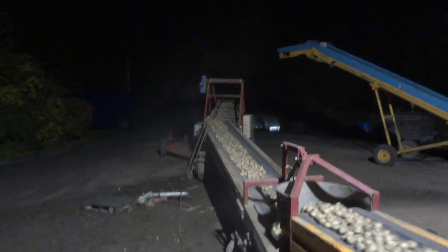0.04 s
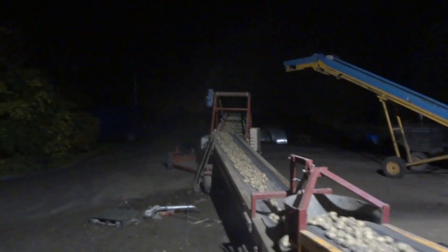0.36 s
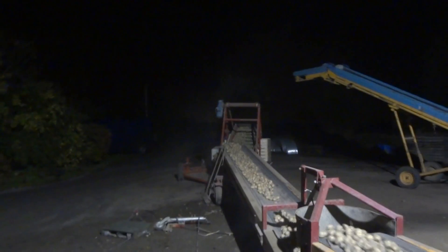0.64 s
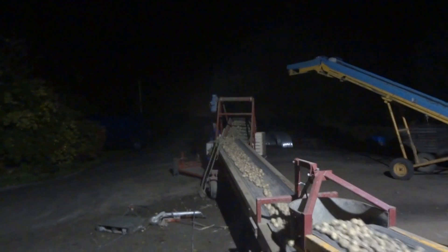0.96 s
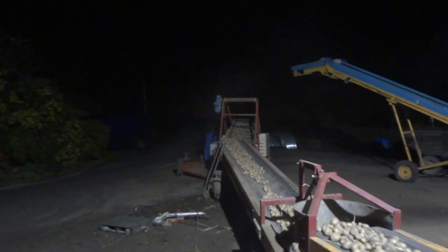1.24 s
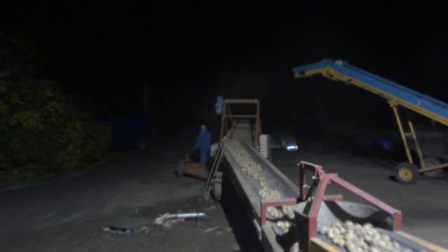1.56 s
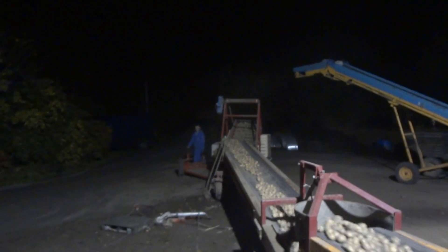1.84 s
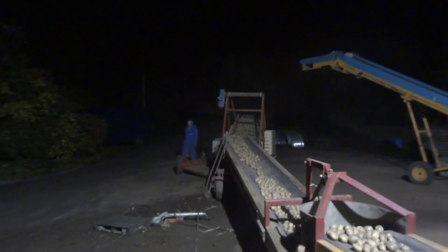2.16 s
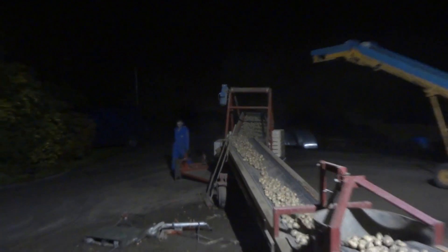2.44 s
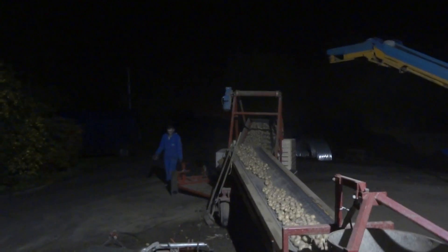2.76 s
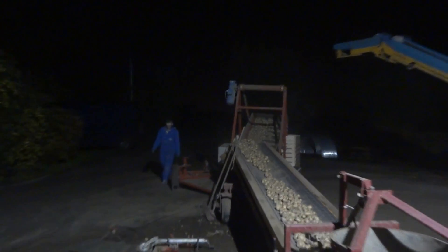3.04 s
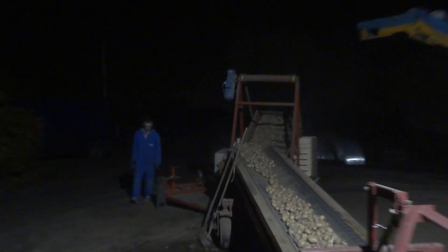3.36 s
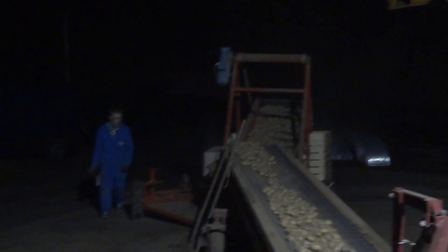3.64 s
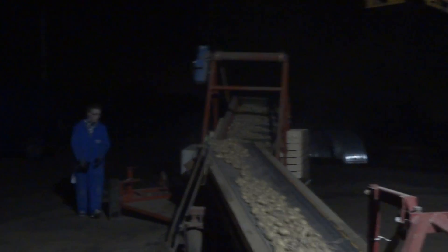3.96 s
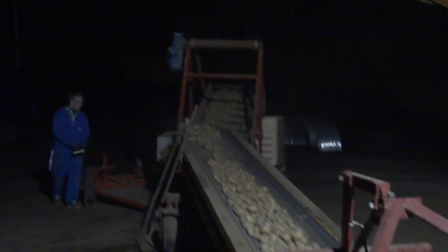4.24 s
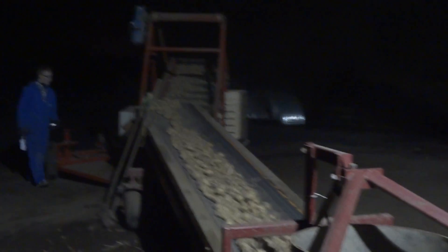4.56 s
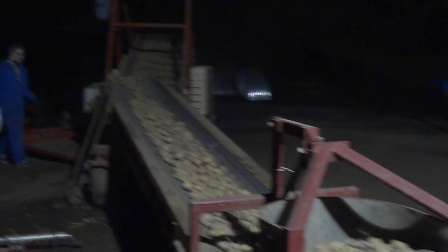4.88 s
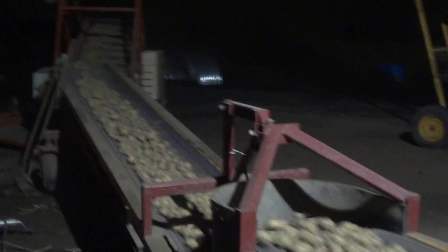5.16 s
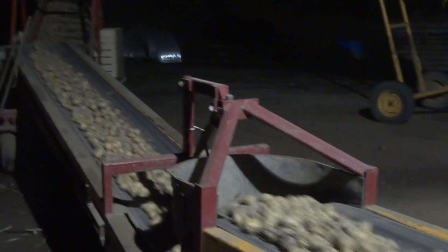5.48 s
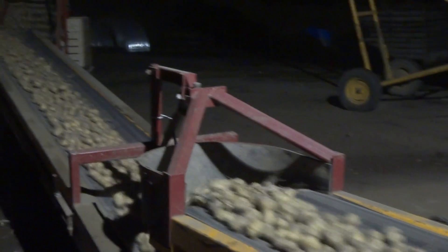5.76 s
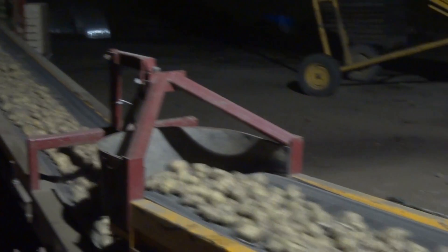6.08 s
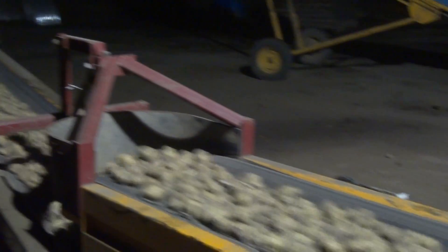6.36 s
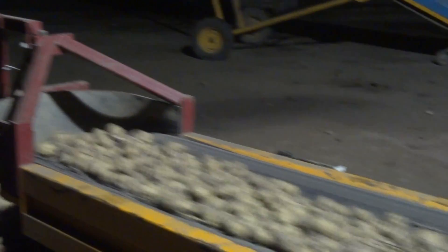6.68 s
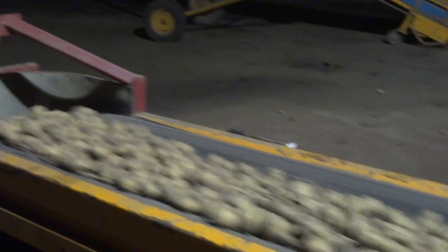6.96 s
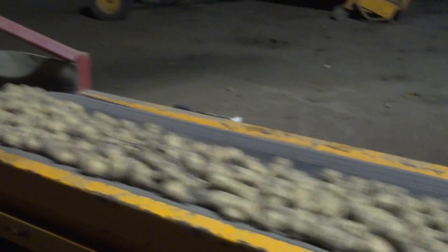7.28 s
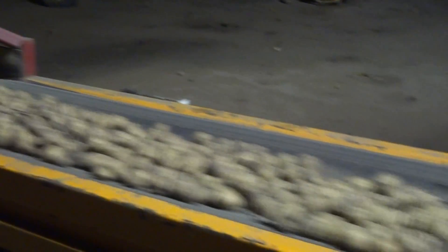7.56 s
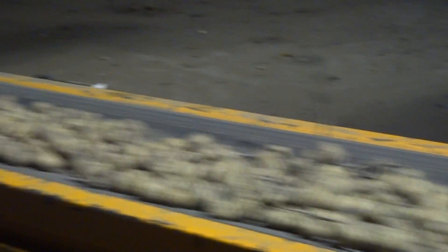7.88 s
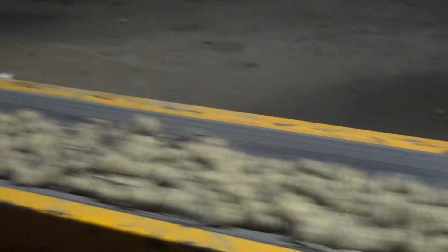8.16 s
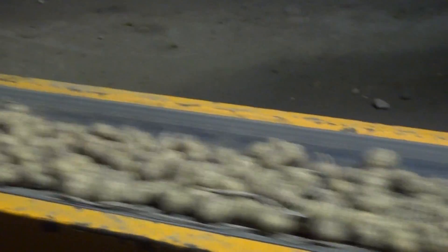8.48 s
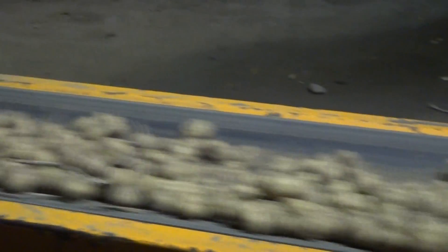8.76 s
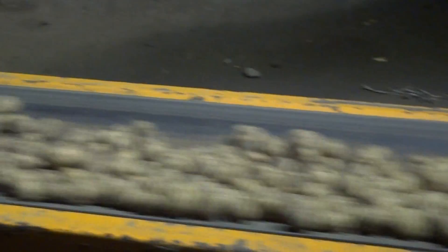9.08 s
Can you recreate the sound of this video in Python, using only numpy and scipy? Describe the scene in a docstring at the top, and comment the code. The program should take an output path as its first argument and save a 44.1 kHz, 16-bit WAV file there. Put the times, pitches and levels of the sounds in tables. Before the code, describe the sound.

Conveyor machinery runs outdoors for about nine seconds. From the start, two motors whine at nearly the same medium-high pitch, fluttering against each other over rumbling belts. Potatoes drum into a steel hopper with irregular low booms, and a faint deep shudder returns about every two seconds. Soil scrapes and hisses throughout, swelling with a light rattle of crumbs around 2 seconds. Grit ticks on the metal now and then between 2.3 and 7.6 seconds. At 3.4 seconds a sharp double click snaps beside the microphone, and near 5.4 seconds a dry roller gives one tiny high squeak. From about 4.5 seconds the whine grows louder and steadier as the microphone turns toward the nearest belt. From about 8 seconds that belt drones close by, and potatoes rub, jostle and knock with short dull clacks until the end.

```python
"""Two geared motors whine at nearly one pitch and beat, over potatoes drumming into a steel hopper.
Conveyors carry the crop across a yard at night: belts rumble, soil rubs and hisses, grit ticks on the
frame and a dry roller squeaks once by stick-slip. A sharp double click makes the limiter duck.
As the microphone turns to the nearest belt, its whine grows and single potatoes jostle and knock."""
import sys
import numpy as np
from scipy import signal
from scipy.fft import rfft, irfft, next_fast_len
from scipy.io import wavfile
from scipy.ndimage import uniform_filter1d, minimum_filter1d, map_coordinates

SR = 44100
rng = np.random.default_rng(int(sys.argv[2]) if len(sys.argv) > 2 else 0)


def bounce(signal):
    """Save signal as a 16-bit WAV file at the path given by the first command-line argument."""
    frames = np.transpose(np.atleast_2d(signal))
    limited = np.clip(frames, -1, 1)
    pcm = np.round(limited * 32767).astype(np.int16)
    wavfile.write(sys.argv[1], SR, pcm)


N = 406602
TIME = np.arange(N) / SR


# partials of a gear whine: (shaft order, level [dB])
MESH_PARTIALS = [(36, 0), (72, -48)]
TEETH = 36

def whine(mesh_hz, flutter_db, jitter_rad):
    """Gear meshing: periodic tooth contact radiates a tone that trembles in level and phase."""
    shaft = (2 * np.pi * np.cumsum(mesh_hz) / SR + jitter_rad * wobble(14)) / TEETH
    return amp(flutter_db * wobble(9)) * sum(amp(db) * np.sin(k * shaft) for k, db in MESH_PARTIALS)


# the near motor slows under load: (time [s], tooth rate [Hz])
NEAR_TOOTH_RATE = [(0, 877.3), (0.8, 878), (1.6, 877.5), (2.3, 876.7), (3.7, 876.7), (4.6, 877.9),
                   (6.55, 878), (7, 875.2), (7.7, 876.1), (8.5, 876.6), (9.22, 875.2)]

def near_mesh_hz(sway_hz=0.6, pulley_hz=1.89):
    """Induction-motor slip: the tooth rate follows the load and sways once per pulley turn."""
    return curve(NEAR_TOOTH_RATE) - sway_hz * np.cos(2 * np.pi * pulley_hz * TIME)


# the near whine grows as the microphone comes round: (time [s], relative level [dB])
NEAR_LEVEL = [(0, -24), (1.8, -22.8), (2.7, -25), (2.87, -30), (3.05, -24.5), (3.4, -26.5), (4.18, -22),
              (4.3, -27), (4.48, -21.5), (5.7, -19.6), (6.45, -17.2), (6.9, -17.4), (7.02, -21.5),
              (7.12, -18), (7.3, -19), (7.5, -16.8), (8.1, -16.7), (8.6, -17.7), (8.85, -20.2),
              (9.22, -19.3)]

def near_drive():
    """Direct field: the whine steadies as direct sound takes over, then drops as the turn ends."""
    steady = onset(4.5, 2.2)
    tone = whine(near_mesh_hz(), flutter_db=1.4 - 1.1 * steady, jitter_rad=0.25 * (1 - steady))
    level_db = curve(NEAR_LEVEL) + 0.63 - 10 * onset(9.1, 0.1)
    return placed(amp(level_db) * tone, pan_db=turned(1.2, 6.5))


# the far whine fades behind the microphone: (time [s], relative level [dB])
FAR_LEVEL = [(0, -23), (0.8, -26.3), (1.4, -24.6), (2, -24), (2.6, -26.8), (3.5, -28), (4.3, -26),
             (5.2, -29.5), (6.4, -31), (7.35, -25.5), (7.85, -29.5), (8.25, -38), (9.22, -40)]
# hum of its casing: (shaft order, relative level [dB])
CASING_PARTIALS = [(5, -3), (18, 2.2), (24, -14), (30, -9), (42, -14), (54, -17), (60, -11)]

def far_drive(tooth_hz=890.85):
    """Beating: this motor slips less, so its whine beats with the near one about 14 times a second."""
    mesh_hz = np.full(N, tooth_hz)
    tone = amp(curve(FAR_LEVEL)) * whine(mesh_hz, flutter_db=0.7, jitter_rad=0.12)
    casing_db = -32.4 - 9.5 * onset(4.8, 1.5)  # fades as the microphone turns away
    casing = amp(casing_db) * shaft_hum(mesh_hz + 4 * wobble(30), CASING_PARTIALS, flutter_db=2.6)
    return placed(casing, pan_db=-2) - placed(tone, pan_db=-0.5)


# vibration of the conveyor frame: (shaft order, relative level [dB])
FRAME_PARTIALS = [(30, -5), (31, -6), (32, -4), (35, 0), (36, -4), (37, -3)]

def frame():
    """Structure-borne sound: the long frame radiates a faint, smeared copy of the near whine."""
    hum = shaft_hum(near_mesh_hz() + 4.5 * wobble(35), FRAME_PARTIALS, flutter_db=2.5)
    return placed(amp(turned(-36.5, -49)) * hum, pan_db=7)


def shaft_hum(mesh_hz, partials, flutter_db):
    """Amplitude modulation: each harmonic of the shaft's rotation flutters with the load."""
    shaft = 2 * np.pi * np.cumsum(mesh_hz / TEETH) / SR
    return sum(amp(db + flutter_db * wobble(7.5)) * np.sin(k * shaft + rng.uniform(0, 2 * np.pi))
               for k, db in partials)


# rumble of the hopper: (frequency [Hz], spectral level [dB])
DRUM_SPECTRUM = [(15, -38), (35, -27), (55, -18), (85, -9), (125, -5.5), (165, 0), (220, -0.5), (280, -5.5),
                 (316, -1), (380, -9.5), (480, -20.5), (900, -42), (3000, -120)]

def drumming():
    """Shot noise: the blows of many tumbling potatoes merge into a low rumble."""
    drum = coloured(impacts(per_s=700, scatter_db=3, t60=0.042, bed_db=6), DRUM_SPECTRUM)
    return amp(turned(-16.5, -18.5)) * spread(drum, pan_db=turned(-4.4, -3.6), side_db=-24)


# modes of the hopper's steel walls: (frequency [Hz], level [dB], t60 [s])
WALL_MODES = [(124.3, -5.5, 0.53), (163, -4, 0.29), (176, -5.5, 0.3), (198, -7.5, 0.18), (229, -6, 0.25),
              (314.4, -4, 0.34), (345.5, -10, .2), (384, -17, 0.13)]
# brief low booms in the hopper's rumble: (time [s], peak level [dB], strongest frequency [Hz])
BOOMS = [(0.50, -12, 192), (0.59, -16, 125), (0.735, -14.5, 315), (0.875, -13, 315), (0.985, -11, 170),
         (1.11, -12, 315), (1.44, -18, 190), (1.72, -11, 235), (1.80, -13, 315), (2.04, -15, 315),
         (2.164, -9.5, 174), (2.42, -17, 125), (2.495, -12.5, 180), (2.725, -8, 190), (2.875, -13, 166),
         (3.02, -12, 170), (3.265, -8, 165), (3.64, -13, 225), (3.655, -11.5, 315), (3.725, -10.5, 165),
         (3.88, -14, 315), (4.315, -14, 160), (4.40, -10, 180), (4.809, -15, 230), (5.08, -11, 165),
         (5.18, -10.5, 315), (5.455, -13, 315), (5.639, -15, 180), (5.925, -12, 225), (6.605, -15, 130),
         (6.95, -13, 160), (7.101, -9, 200), (7.29, -13, 165), (7.56, -14, 170), (7.91, -11.5, 179),
         (8.93, -13, 175)]

def hopper_walls(attack_s=0.013):
    """Modal resonance: the falling crop keeps the walls ringing, and brief low booms stand out."""
    def resonance(f):
        return sum(amp(db) / (1 + 1j * (f - hz) * t60 * 2 * np.pi / np.log(1000)) ** 2
                   for hz, db, t60 in WALL_MODES)
    out = amp(turned(-25, -28.5)) * unit(filtered(rng.standard_normal(N), resonance))
    t = np.arange(SR // 4) / SR
    for start, peak_db, centre_hz in BOOMS:
        boom = np.zeros(len(t))
        for hz, db, t60 in WALL_MODES:
            envelope = amp(db + rng.normal(0, 1.6) - 60 * t / t60) * band(hz, centre_hz, octaves=0.24)
            boom += envelope * np.sin(2 * np.pi * (hz * t + rng.random()))
        boom *= 1 - np.exp(-t / attack_s)
        add_at(out, start, amp(peak_db) * boom / np.abs(boom).max())
    return placed(out, pan_db=-4.5)


# rumble of the belts: (frequency [Hz], spectral level [dB])
BELT_SPECTRUM = [(100, -16), (350, -0.5), (520, 1), (680, -0.5), (900, 0), (1020, -4), (1250, -9.5),
                 (1800, -21.5), (7000, -120)]

def belts():
    """Rolling noise: the belts run over their rollers in a dense train of soft contacts."""
    rumble = coloured(impacts(per_s=500, scatter_db=1, t60=0.042, bed_db=-16), BELT_SPECTRUM)
    return amp(turned(-22, -21)) * spread(rumble, pan_db=turned(-0.7, 0.3), side_db=-13.5)


# scrape and hiss of sliding soil, each: (frequency [Hz], spectral level [dB])
SCRAPE_SPECTRUM = [(400, -29), (900, -5.5), (1300, -1), (1700, 1), (2100, 3), (2650, -0.5), (3300, -9),
                   (5000, -24), (14000, -120)]
HISS_SPECTRUM = [(1200, -26), (2600, -10), (4300, 0), (5600, -0.5), (6500, -4), (9000, -6.5), (11000, -13),
                 (12700, -16), (14500, -25), (15600, -35)]
# swells of scrape and hiss: (start [s], hold [s], extra scrape [dB], extra hiss [dB])
SOIL_SWELLS = [(0.05, 0.34, 0, 1.5), (1.776, 0.55, 2, 3), (3.8, 0.25, 1, 1), (6.75, .3, 0.5, 1),
               (8.05, 0.5, 2, 0.5)]
SWELL_RISE_S, SWELL_FALL_S = 0.3, 0.2

def soil():
    """Sliding friction: soil scrapes and hisses along, swelling slightly now and then."""
    scrape_db, hiss_db = turned(-28.5, -29), turned(-36, -38)
    for start, hold, extra_scrape_db, extra_hiss_db in SOIL_SWELLS:
        envelope = swell(start, SWELL_RISE_S, hold, SWELL_FALL_S)
        scrape_db += extra_scrape_db * envelope
        hiss_db += extra_hiss_db * envelope
    rubbing = impacts(per_s=260, scatter_db=3, t60=0.06, bed_db=1) * amp(0.45 * wobble(6))
    scrape = spread(coloured(rubbing, SCRAPE_SPECTRUM), pan_db=-1.4, side_db=-11.5)
    hiss = spread(coloured(rubbing, HISS_SPECTRUM), pan_db=-2.3, side_db=-18.5)
    return amp(scrape_db) * scrape + amp(hiss_db) * hiss


# small contacts of potatoes or crumbs: (frequency [Hz], spectral level [dB])
CONTACT_SPECTRUM = [(500, -27), (1300, -2.5), (2100, 2), (3600, -2.5), (5000, -4), (6500, -11), (9000, -16),
                    (11000, -20), (14000, -45)]
PASS_S, PASS_RISE_S = 7.69, 0.57  # the nearest belt comes under the microphone

def jostling():
    """Contact noise: potatoes rub and nudge each other, swelling as they pass and then staying close."""
    passing = amp(-38) * swell(PASS_S, PASS_RISE_S, hold=0.44, fall=0.2)
    close_by = amp(-29) * onset(PASS_S, PASS_RISE_S)
    jostle = coloured(impacts(per_s=510, scatter_db=2.5, t60=0.036, bed_db=-4.5), CONTACT_SPECTRUM)
    uneven = amp(0.6 * wobble(14))
    return (passing + close_by) * uneven * spread(jostle, pan_db=-3, side_db=-17)


def crumbs():
    """Sparse impacts: dry crumbs of soil rattle on the steel during the strongest swell of hiss."""
    start, hold, _, _ = max(SOIL_SWELLS, key=lambda row: row[-1])
    rattle = coloured(impacts(per_s=130, scatter_db=3.5, t60=0.022, bed_db=-14), CONTACT_SPECTRUM)
    level = amp(-40) * swell(start, SWELL_RISE_S, hold, SWELL_FALL_S)
    return level * spread(rattle, pan_db=-2, side_db=-15)


# potatoes colliding under the microphone: (time [s], relative level [dB], band centre [Hz])
COLLISIONS = [(8.0377, -21, 2410), (8.147, -10, 2200), (8.2553, -17, 1960), (8.345, -18, 4800),
              (8.47, -12, 4000), (8.565, -13, 3600), (8.607, -13, 2090), (8.645, -7.5, 2300),
              (8.7052, -21, 3100), (8.7471, -8, 2020), (8.8, -17, 2360), (8.9701, -22, 2150),
              (9.1333, -17, 2310)]

def knocks(attack_s=0.003, t60=0.057, gain_db=-8):
    """Internal damping: soft flesh absorbs each collision, leaving a short, dull clack."""
    t = np.arange(SR // 16) / SR
    hz = np.fft.rfftfreq(len(t), 1 / SR) + 1
    envelope = (1 - np.exp(-t / attack_s)) * amp(-60 * t / t60)
    out = np.zeros((2, N))
    for start, level_db, centre_hz in COLLISIONS:
        clack = noise_burst(len(t), band(hz, centre_hz, octaves=0.45))
        add_at(out, start, amp(level_db + gain_db) * envelope * clack)
    return spread(out, pan_db=-3, side_db=-16)


# stones striking the frame: (time [s], relative level [dB], tilt [dB/octave], edge ring [Hz])
STONE_STRIKES = [(2.329, -26, 14, 13000), (2.9008, -22, 4, 9000), (3.002, -18.5, -2, 4000),
                 (3.1193, -19, -1, 4000), (4.4799, -28, -1, 5000), (5.168, -23, 1.5, 5900),
                 (5.5278, -18, -1, 4000), (5.628, -26, -5, 4200), (6.914, -17.5, -1, 5920),
                 (6.9735, -20, -1, 4000), (7.336, -21, 3, 7550), (7.579, -20, -2, 5470)]
# a tick before its tilt: (frequency [Hz], spectral level [dB])
TICK_SPECTRUM = [(1500, -15), (4000, 8), (6000, 3), (9500, -5), (14000, -25), (17000, -32)]

def grit(rise_s=0.004, t60=0.091, rough_hz=60, pivot_hz=6000):
    """Impact excitation: stones graze the frame; each tick has its own brightness and a brief ring."""
    t = np.arange(SR // 5) / SR
    hz = np.fft.rfftfreq(len(t), 1 / SR) + 1
    octaves = np.log2(np.maximum(hz, TICK_SPECTRUM[0][0]) / pivot_hz)
    envelope = np.minimum(t / rise_s, 1) * amp(-60 * np.maximum(t - rise_s, 0) / t60)
    out = np.zeros((2, N))
    for start, level_db, tilt, ring_hz in STONE_STRIKES:
        tick = amp(-9) * noise_burst(len(t), amp(along(TICK_SPECTRUM, hz) + tilt * octaves))
        tick[0] += amp(-14) * sine(ring_hz + rough_hz * wobble(550)[:len(t)])  # direct sound only
        add_at(out, start - rise_s / 2, amp(level_db) * envelope * tick)
    return spread(out, pan_db=1, side_db=-13)


# snaps beside the microphone: (time [s], level before limiting [dB], frequency [Hz], t60 [s])
SNAPS = [(3.407, -4, 3900, 0.0016), (3.4179, 8, 9250, 0.0019)]

def clicks():
    """Damped oscillation: two hard snaps, each dying within two milliseconds."""
    out, t = np.zeros(N), np.arange(SR // 50) / SR
    for start, db, hz, t60 in SNAPS:
        add_at(out, start, amp(db - 60 * t / t60) * np.sin(2 * np.pi * hz * t))
    return placed(out, pan_db=-5)


# bands of the roller's squeal: (pitch ratio, level [dB], lag [s], hold [s], drag level [dB])
SQUEAL_BANDS = [(1, -21, .002, .006, -41), (1.09, -26.5, .005, .018, -34.5), (2, -44, .003, .007, -60),
                (2.19, -42.5, .005, .014, -50)]

def roller_squeak(start=5.443, pitch_hz=4700, rough_hz=125, rise_s=0.006, fall_s=0.007, drag_s=0.057):
    """Stick-slip: a dry roller squeals in two rough bands and their octaves, then drags on faintly."""
    out = np.zeros(N)
    for ratio, level_db, lag, hold, drag_db in SQUEAL_BANDS:
        slip = amp(level_db) * swell(start + lag, rise_s, hold, fall_s)
        drag = amp(drag_db) * swell(start + lag, rise_s, drag_s, fall_s)
        chatter = unit(amp(3 * wobble(260)))
        out += (slip + drag) * chatter * sine(ratio * pitch_hz + rough_hz * wobble(900))
    return placed(out, pan_db=0)


# drone of the steel trough: (frequency [Hz], spectral level [dB])
TROUGH_SPECTRUM = [(400, -40), (540, -18), (625, 1), (700, -3), (760, -1), (850, -33), (1200, -70)]

def trough():
    """Resonance: the nearest belt drones in its trough, heard once the microphone is over it."""
    drone = coloured(rng.standard_normal((2, N)), TROUGH_SPECTRUM)
    return amp(-28.5) * onset(PASS_S, PASS_RISE_S) * spread(drone, pan_db=3, side_db=-14)


# deep shudder of the frame: (frequency [Hz], spectral level [dB])
THRUM_SPECTRUM = [(30, -30), (60, -15), (90, 1), (125, 6), (170, -17), (400, -60)]

def thrum(first_s=0.53, period_s=2.057, width_s=0.3):
    """Periodic forcing: the frame shudders each time the heavy part of a belt comes round."""
    from_peak_s = (TIME - first_s + period_s / 2) % period_s - period_s / 2
    level = amp(turned(-26.5, -34)) * np.exp(-(from_peak_s / width_s) ** 2 / 2)
    shudder = coloured(rng.standard_normal((2, N)), THRUM_SPECTRUM)
    return level * spread(shudder, pan_db=-6, side_db=-23)


# sound returned by the yard: (frequency [Hz], gain [dB])
YARD_RESPONSE = [(200, 1), (600, -3), (1100, -0.5), (1600, 2), (2400, -4), (6000, 4), (8500, -1),
                 (12000, 5)]

def spread(pair, pan_db, side_db):
    """Direct and diffuse fields: the first signal is panned, the second returns in antiphase."""
    diffuse = filtered(pair[1], lambda hz: amp(side_db + along(YARD_RESPONSE, hz)))
    return placed(pair[0], pan_db) + np.array([diffuse, -diffuse])


# the microphone's swing: (time [s], turn [0 = far line, 1 = nearest belt])
MICROPHONE_TURN = [(4.4, 0), (9.22, 0.72)]

def turned(far, near):
    """Linear interpolation: a value moves from far part of the way to near as the microphone turns."""
    return far + (near - far) * curve(MICROPHONE_TURN)


def placed(x, pan_db):
    """Level panning: pan_db louder on the left."""
    return np.array([x * amp(pan_db / 2), x * amp(-pan_db / 2)])


def impacts(per_s, scatter_db, t60, bed_db, attack_s=0.003):
    """Incoherent summation: random dying contacts add in power over a bed of countless small ones."""
    hits = rng.random(N) < per_s / SR
    power = hits * amp(scatter_db * np.clip(rng.standard_normal(N), -2, 2)) ** 2
    t = np.arange(SR // 4) / SR
    contact = (1 - np.exp(-t / attack_s)) * amp(-60 * t / t60)
    bursts = unit(np.sqrt(np.abs(signal.fftconvolve(power, contact ** 2)[:N])))
    return unit(np.hypot(bursts, amp(bed_db)) * rng.standard_normal((2, N)))


def noise_burst(length, gains):
    """Two noises shaped by a gain per frequency bin, at rms 1."""
    return unit(irfft(rfft(rng.standard_normal((2, length))) * gains))


def coloured(x, spectrum):
    """x through a (frequency [Hz], level [dB]) spectrum, at rms 1."""
    return unit(filtered(x, lambda hz: amp(along(spectrum, hz))))


def filtered(x, response):
    """Linear filtering: the spectrum of x times a frequency response."""
    size = next_fast_len(N + SR // 2)
    return irfft(rfft(x, size) * response(np.fft.rfftfreq(size, 1 / SR)), size)[..., :N]


def band(hz, centre_hz, octaves):
    """A Gaussian band on a log-frequency axis."""
    return np.exp(-(np.log2(hz / centre_hz) / octaves) ** 2 / 2)


def along(points, hz):
    """(frequency [Hz], value) points read on a log axis."""
    f, value = np.transpose(points)
    return np.interp(np.log(hz + 1), np.log(f), value)


def curve(points):
    """(time [s], value) points read at every sample."""
    return np.interp(TIME, *np.transpose(points))


def swell(start, rise, hold, fall):
    """An attack-hold-release envelope, 0 to 1; times in seconds."""
    return np.interp(TIME, start + np.cumsum([0, rise, hold, fall]), [0, 1, 1, 0])


def onset(start, rise):
    """A ramp from 0 to 1 that stays up; times in seconds."""
    return curve([(start, 0), (start + rise, 1)])


def wobble(rate):
    """A smooth random curve, rate knots a second."""
    return map_coordinates(rng.standard_normal(int(N * rate / SR) + 4), [TIME * rate])


def sine(hz):
    """A tone whose phase is the integral of its frequency."""
    return np.sin(2 * np.pi * np.cumsum(hz) / SR)


def add_at(out, start, sound):
    """Mix sound into out from start [s]."""
    out[..., round(start * SR):][..., :sound.shape[-1]] += sound


def amp(db):
    """Decibels to gain."""
    return 10 ** (np.asarray(db) / 20)


def unit(x):
    """Scale to rms 1."""
    return x / np.sqrt(np.mean(x ** 2) + 1e-20)


def scene():
    """Superposition: all sources of the running line add."""
    drives = np.sqrt(2) * (near_drive() + far_drive() + frame())  # sine levels are rms
    crop = drumming() + belts() + soil() + crumbs() + hopper_walls()
    nearest_belt = jostling() + trough() + knocks()
    return drives + crop + nearest_belt + grit() + clicks() + roller_squeak() + thrum()


def limiter(x, ceiling=0.72, release_db_per_s=620):
    """Look-ahead limiting: the gain falls just before a peak, holds briefly and climbs back."""
    hold, attack = int(0.010 * SR), int(0.005 * SR)
    need_db = np.minimum(0, 20 * np.log10(ceiling / (np.abs(x).max(axis=0) + 1e-9)))
    held_db = minimum_filter1d(need_db, hold, origin=(hold - attack) // 2)
    climb_db = release_db_per_s * TIME
    gain_db = climb_db + np.minimum.accumulate(held_db - climb_db)
    return x * amp(uniform_filter1d(gain_db, attack))


# phase between the two microphone ports: (frequency [Hz], lead of the left [rad])
LEFT_LEAD = [(90, -0.28), (400, -0.0038), (880, -0.13), (1250, -.27), (1750, 0.028), (2800, -.17),
             (4000, -0.1)]
TOP_HZ = 15700

def record(dry):
    """Transduction: the input unmutes and is peak- and band-limited; the right port mostly leads."""
    def response(hz):
        phase = along(LEFT_LEAD, hz) * np.array([[0.5], [-0.5]])
        return np.exp(1j * phase) * (hz < TOP_HZ)
    unmute = onset(0.039, 0.021) ** 2
    return filtered(limiter(dry * unmute), response)


dry = scene()
out = record(dry)
bounce(out)
```